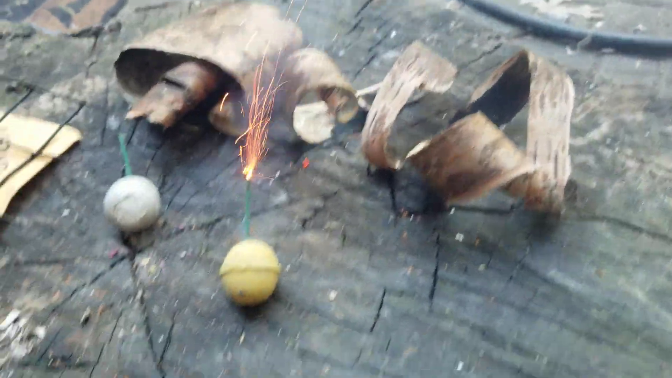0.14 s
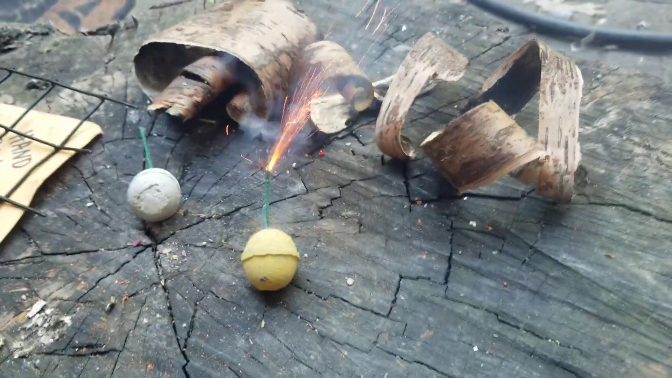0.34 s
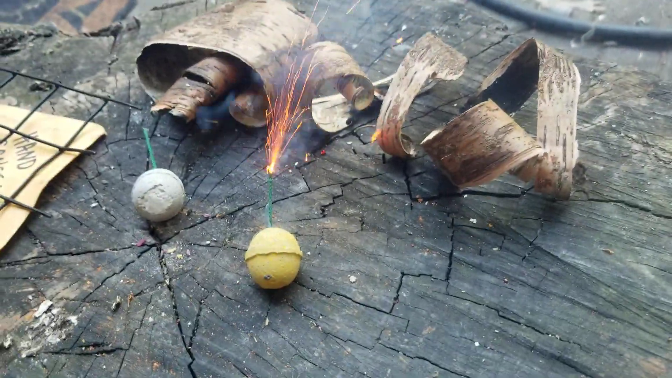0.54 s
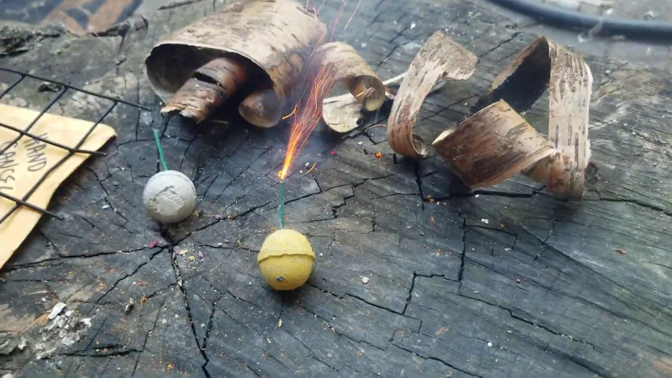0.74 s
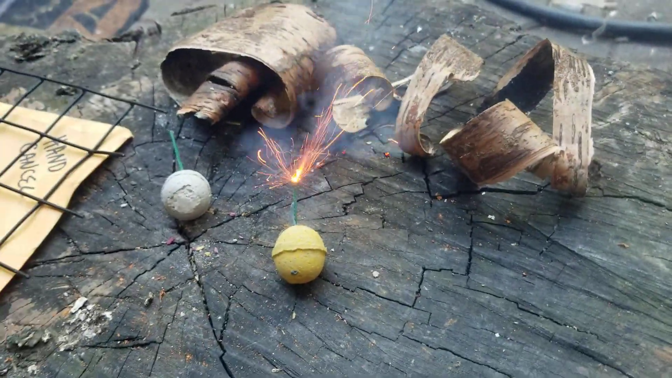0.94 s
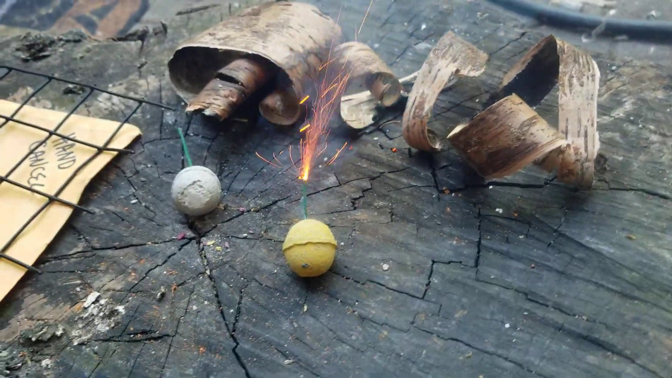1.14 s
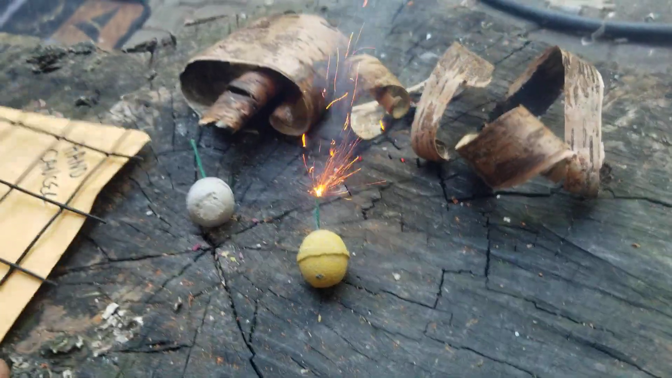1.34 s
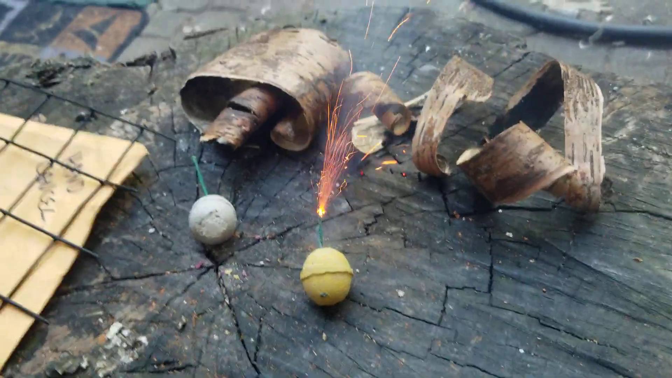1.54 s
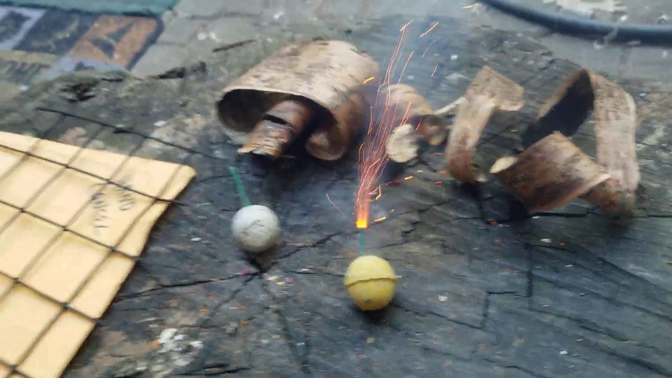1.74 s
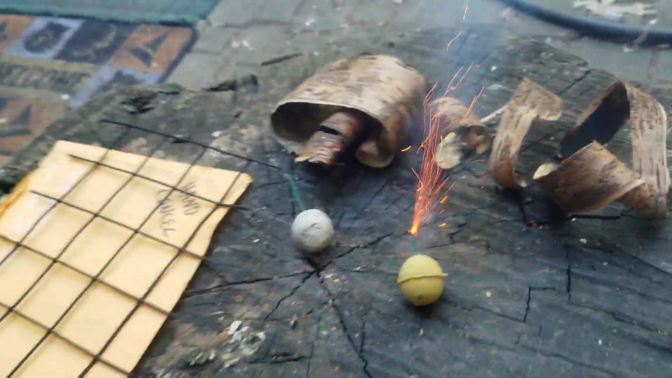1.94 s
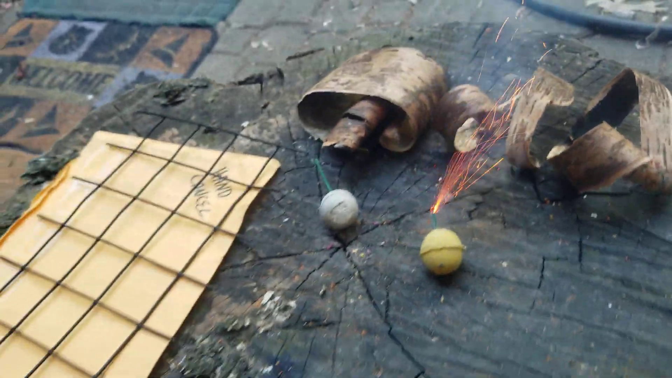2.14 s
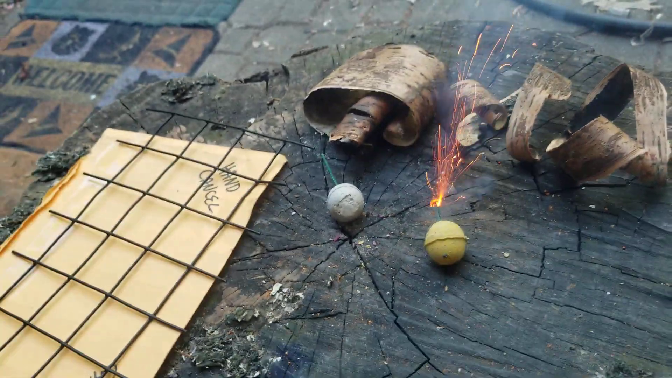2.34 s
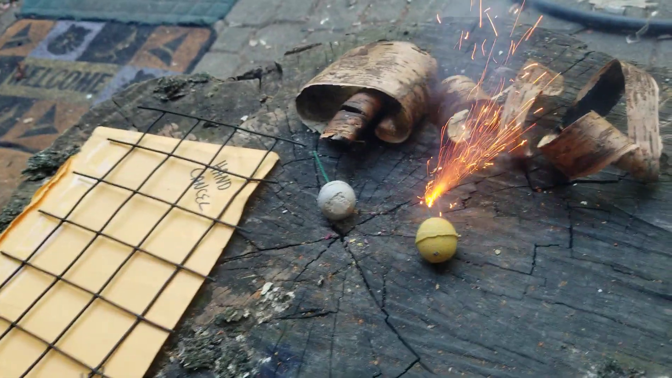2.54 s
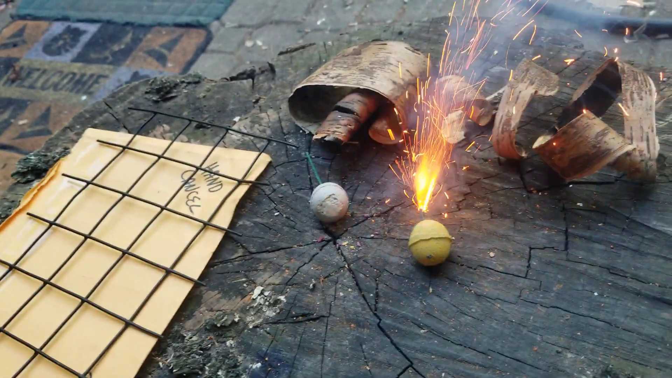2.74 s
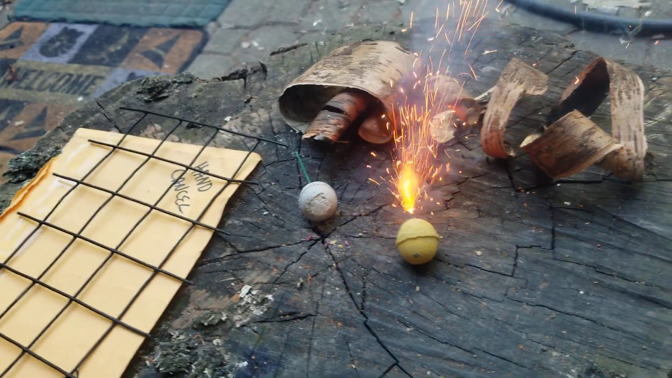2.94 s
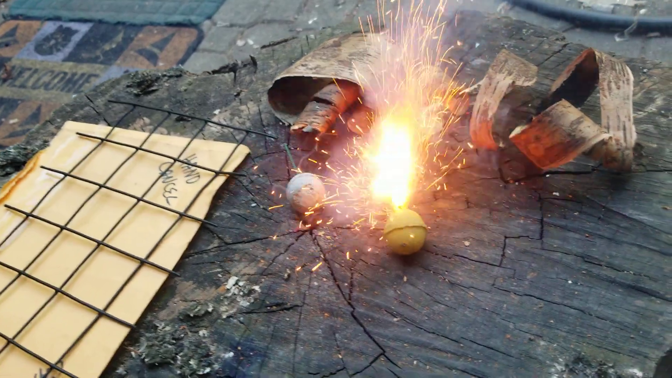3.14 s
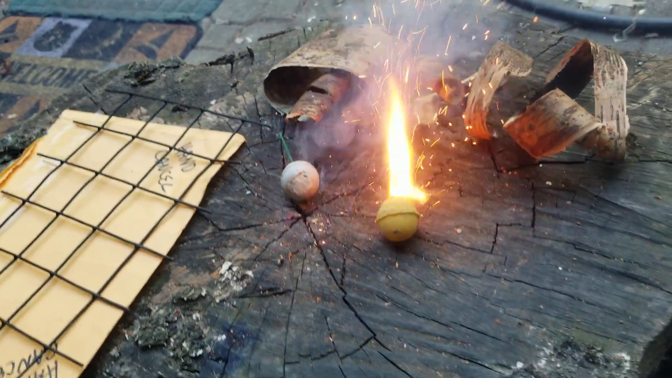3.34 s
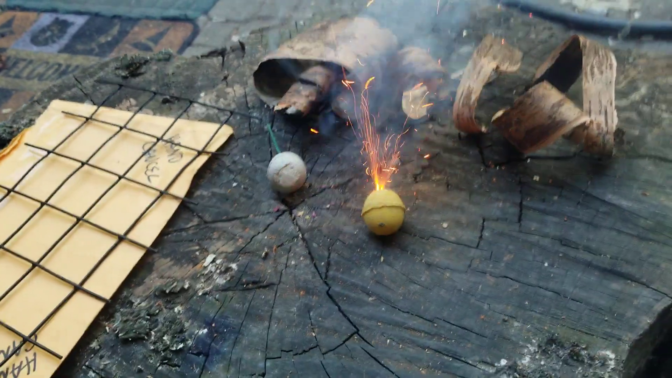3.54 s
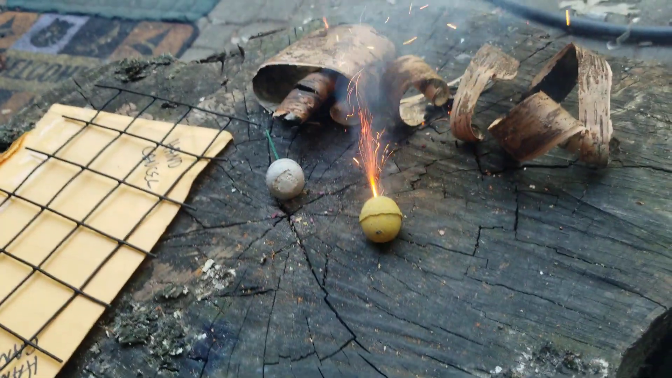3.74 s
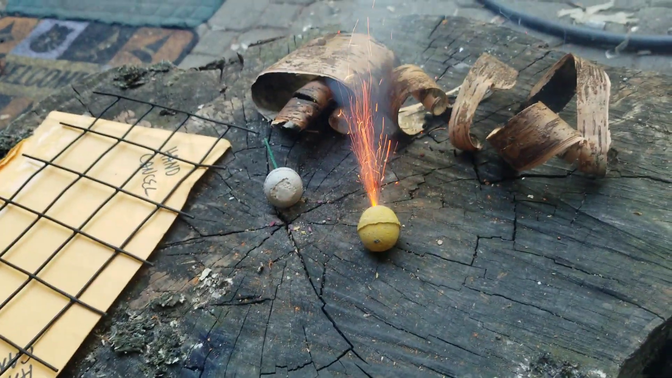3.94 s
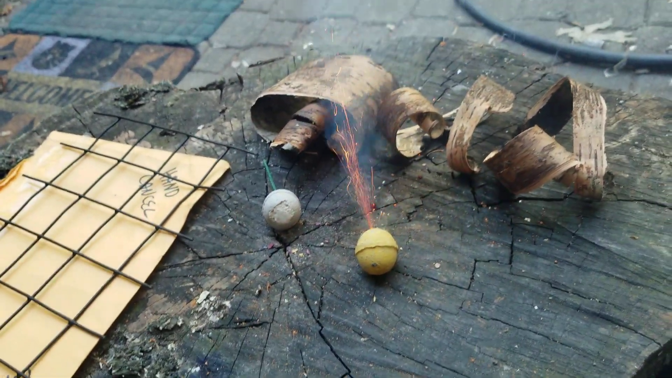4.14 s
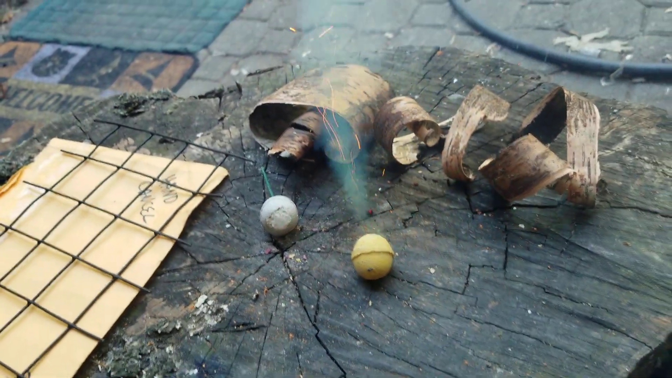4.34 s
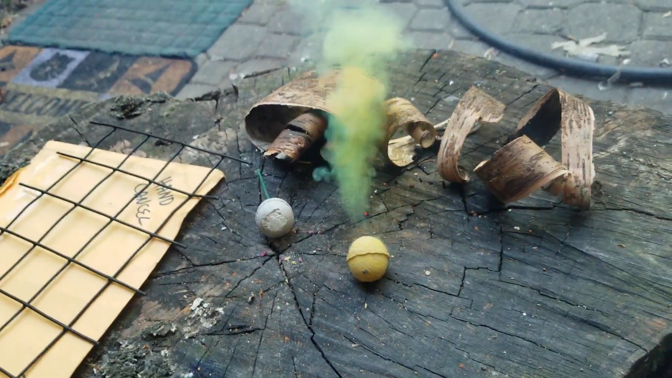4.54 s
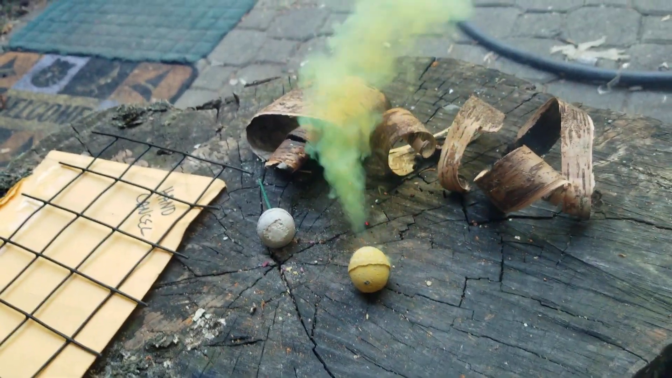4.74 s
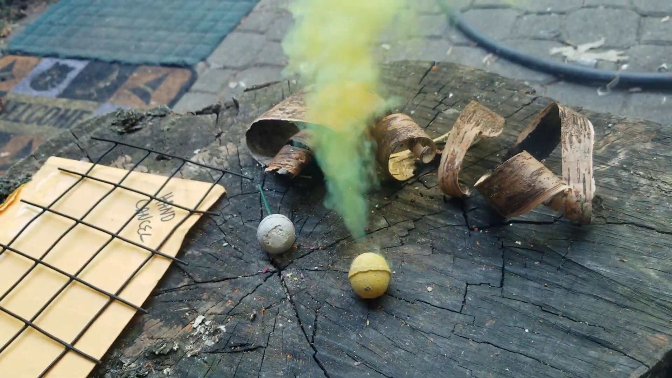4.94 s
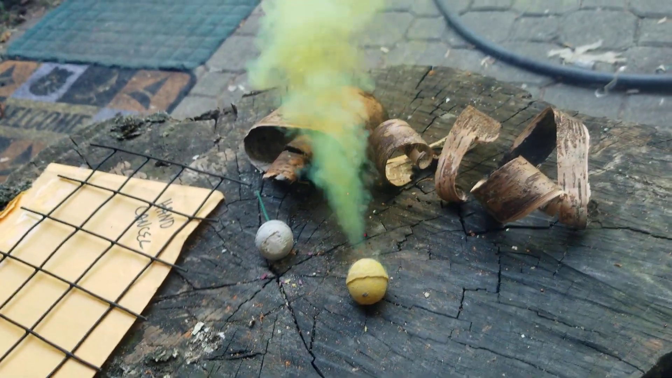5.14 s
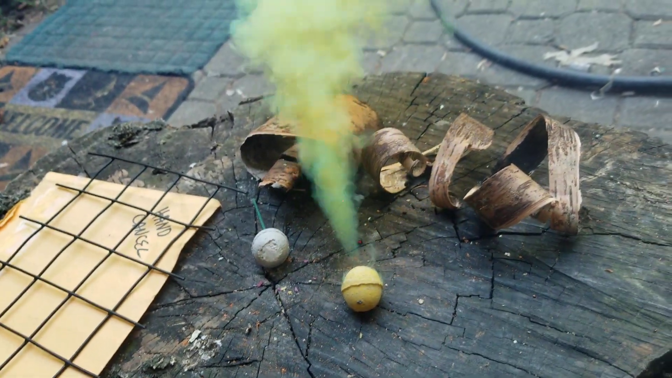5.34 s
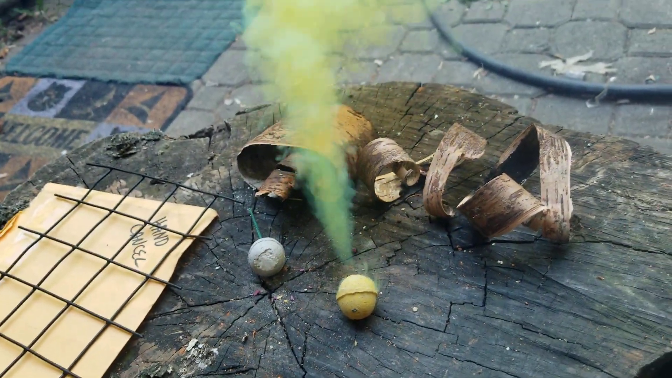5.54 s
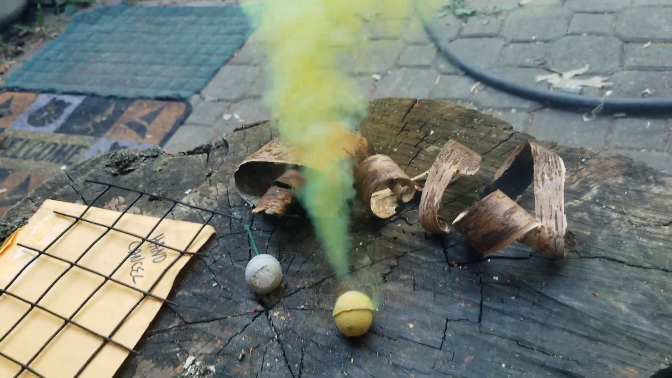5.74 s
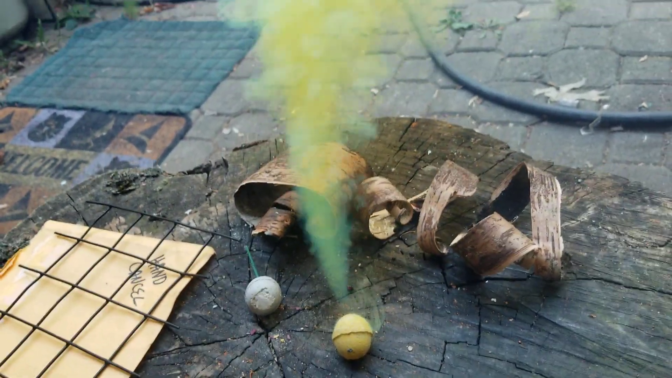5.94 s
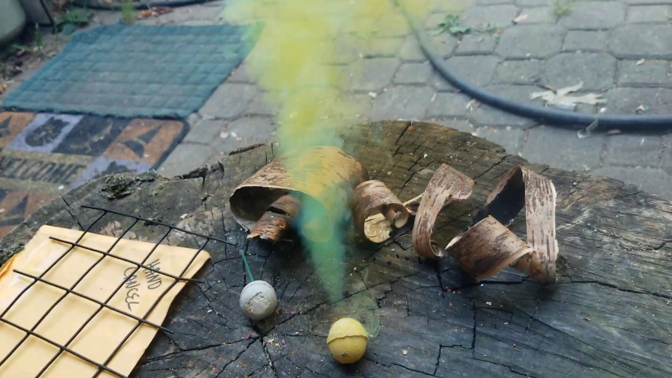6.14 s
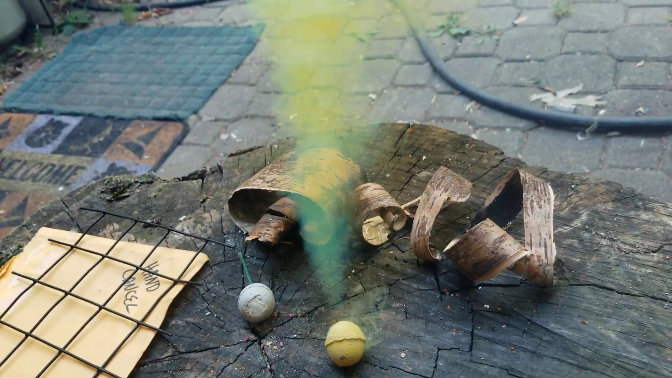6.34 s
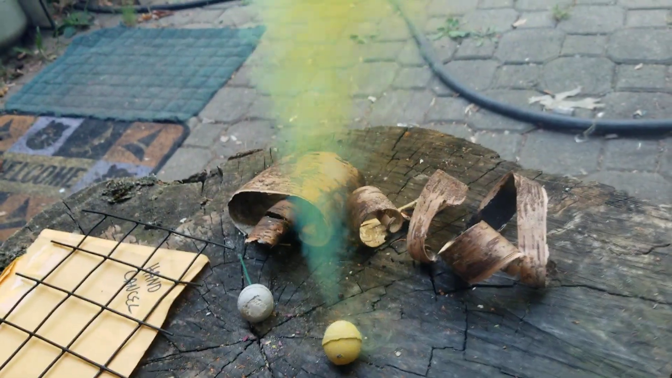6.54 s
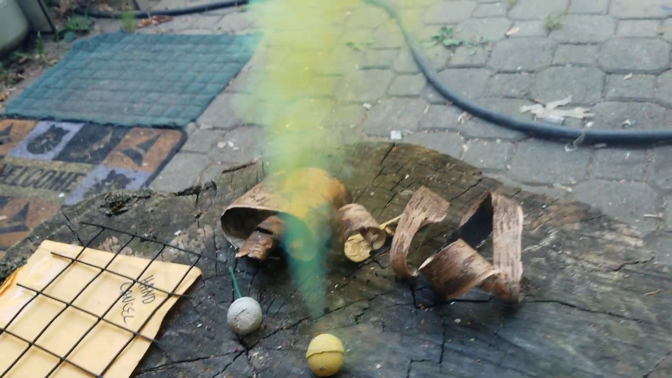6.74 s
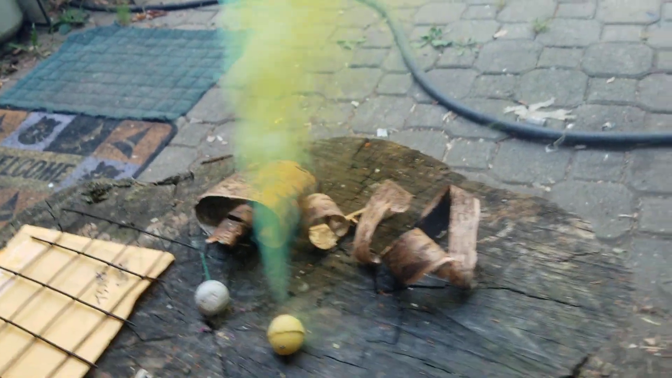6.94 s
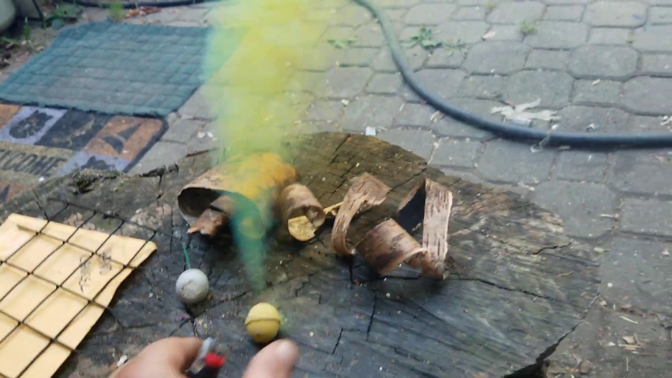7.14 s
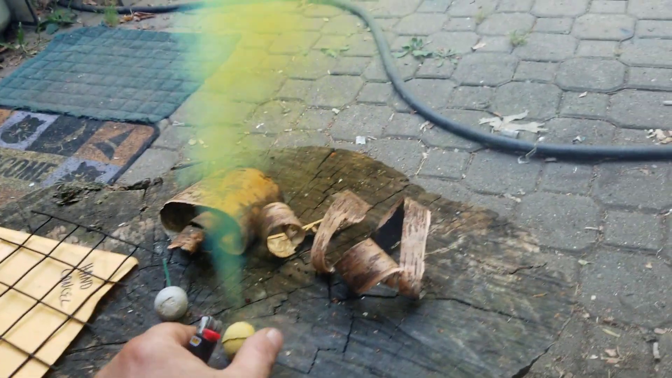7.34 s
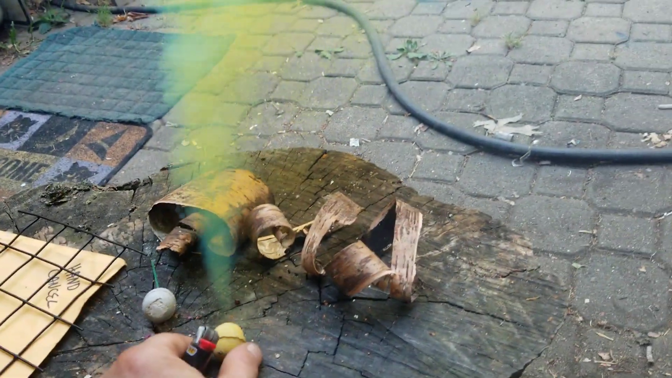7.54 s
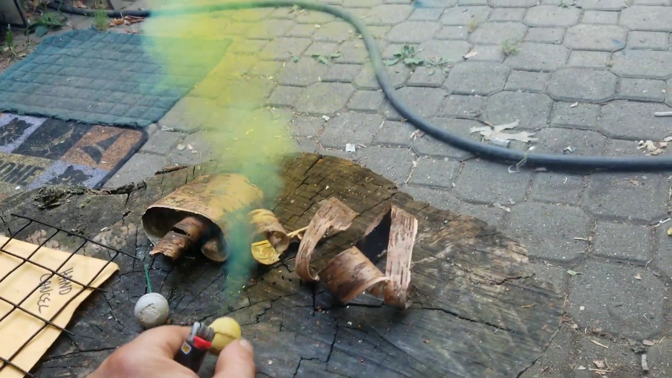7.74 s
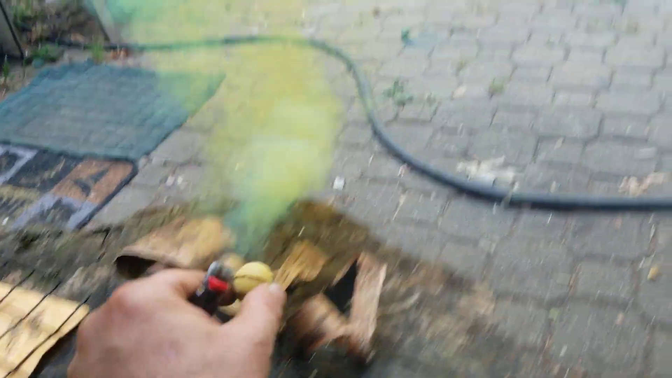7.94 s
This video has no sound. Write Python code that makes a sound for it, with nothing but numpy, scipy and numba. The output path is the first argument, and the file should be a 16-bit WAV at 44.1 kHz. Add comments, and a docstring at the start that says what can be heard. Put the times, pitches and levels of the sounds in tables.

```python
"""A fuse burns on a tree stump with a roaring flame and bright gas hiss, dies, and a smoke ball's vent takes over.
Roar and hiss are coloured noise that sputters and surges; puffs are short noise bursts, one with a low thump.
A hand-held phone hears them at two ports, through bounces off its body, the hand and the stump.
Behind: a sine of mains hum, two wavering far engine tones, and noise for traffic rumble and outdoor air."""
import sys
import numpy as np
from scipy import signal
from scipy.fft import rfft, irfft, next_fast_len
from scipy.io import wavfile
from scipy.ndimage import uniform_filter1d, map_coordinates
from numba import njit

SR = 44100
rng = np.random.default_rng(int(sys.argv[2]) if len(sys.argv) > 2 else 0)


def wrap_up_sound(samples):
    """Save the sound to the file named by the first command line argument, as 16-bit audio."""
    columns = np.atleast_2d(samples).T
    # keep every value between -1 and 1, then stretch to whole-number steps
    tamed = np.clip(columns, -1, 1)
    steps = np.round(tamed * 32767).astype(np.int16)
    wavfile.write(sys.argv[1], SR, steps)


N = 356189

# burning fuse, then the smoke vent: start_s, roar_db, hiss_db
FUSE_LEVELS = [(0, -48, -44), (.8, -47.5, -46), (1.2, -47, -43), (1.55, -43, -40.5), (1.75, -43, -39),
               (2.4, -45, -38), (2.6, -43.5, -40.5), (3.0, -46.5, -40.5), (3.37, -45, -40.5),
               (3.46, -42, -33.5), (3.65, -48, -35.5), (4.0, -44, -29.5), (4.16, -45, -32.5),
               (4.3, -43.5, -32), (4.36, -49.5, -36), (4.45, -50.5, -63)]
SMOKE_LEVELS = [(4.6, -55.5, -69), (4.81, -54, -65), (4.88, -51, -54), (5.56, -50.5, -48),
                (5.85, -46.5, -41.5), (6.73, -44.5, -32.5), (7.04, -44, -35), (7.21, -42.5, -29.5),
                (7.29, -42.5, -31), (7.4, -42.5, -29.5), (7.74, -43.5, -34.5), (7.87, -49, -38.5),
                (8.08, -50, -41.5)]
# level of the flame's bass: start_s, level_db
FLAME_BASS_LEVEL = [(0, -52), (1.2, -50), (1.6, -48), (2.7, -47), (3.1, -47), (3.17, -39.5), (3.25, -45.5),
                    (3.37, -45.5), (3.46, -49), (4.3, -55), (4.5, -57.5), (5.3, -59.5), (6.7, -56),
                    (8.08, -58)]
# relative noise colour of roar and hiss at each port, and of the flame's bass: freq_hz, colour_db
ROAR_LEFT_COLOUR = [(200, -10.5), (450, -20), (800, -15.5), (1500, -8.5), (2500, -10.5), (4000, -15),
                    (7000, -14), (16000, -46)]
ROAR_RIGHT_COLOUR = [(200, -8), (450, -9), (800, -1.5), (1200, 2.5), (1650, 10.5), (1950, -3.5),
                     (2400, 0.5), (3500, -7.5), (7000, -8), (16000, -11)]
HISS_LEFT_COLOUR = [(500, -37), (2000, -31), (4000, -7), (6000, -11), (7500, -8.5), (9000, -4), (11000, 2),
                    (13000, 0.5), (15000, 6.5), (16000, 0)]
HISS_RIGHT_COLOUR = [(500, -43), (1550, -20.5), (2500, -5.5), (3500, -3), (4500, -10.5), (5800, -21.5),
                     (6600, -7), (8500, -2.5), (10800, 0.5), (11900, 12.5), (13500, 9), (14800, 5.5),
                     (15500, -5), (16000, 2)]
FLAME_BASS_COLOUR = [(60, 2.5), (150, 2.5), (300, 0.5), (500, -7), (800, 0), (1500, -12), (16000, -58)]
# part of the jet noise that reaches each port by its own paths: freq_hz, level_db
SCATTERED_COLOUR = [(200, -15.5), (500, -5.5), (1000, -10.5), (2000, -4.5), (4000, -0.5), (8000, -2.5),
                    (14000, -4.5)]
# hiss balance as the phone turns: start_s, left_minus_right_db
HISS_PAN = [(0, -6.5), (.8, -3.5), (1.2, -6), (1.75, -8), (1.95, -12), (2.4, -10.5), (3.15, -12),
            (3.45, -9), (4.3, -8), (5.5, -7.5), (5.7, -10), (6.75, -10), (7.1, -6.5), (7.5, -4.5),
            (8.08, -6)]
# the phone's pose: start_s, left_body_bounce_ms, right_body_bounce_ms, left_lag_ms
PHONE_POSE = [(0, 0.2, 0.14, -0.059), (.4, 0.16, 0.13, -0.045), (1.1, 0.15, 0.13, -0.029),
              (1.6, 0.13, 0.13, 0.0039), (2, .12, .13, 0.096), (2.3, 0.12, 0.12486, 0.13),
              (2.7, 0.11, .13, 0.066), (3.1, 0.099, 0.13, 0.056), (4.3, 0.098, 0.13, 0.049),
              (5.5, 0.1, 0.12, 0.025), (6.7, 0.093, 0.12, 0.0077), (7.1, 0.096, 0.14, -0.047),
              (8.08, 0.082, .14, -0.054)]
# strength of the phone body's bounce: left_share, right_share
BODY_BOUNCE_SHARE = (.6, .4)
# bounces off stump, bark and hand: delay_ms, left_share, right_share
NEAR_BOUNCES = [(.36, 0.046, -0.022), (0.467, 0.062, 0.041), (0.524, -0.016, -0.13), (0.602, 0.016, 0.031),
                (0.738, 0.025, -0.083), (0.972, -0.17, 0.091), (1.202, 0.092, -0.13), (1.65, 0.09, -0.12),
                (1.95, -0.063, -0.03)]
# lists of narrow hollows that slide as the phone turns: start_s, centre_hz, depth_0_to_1
LEFT_HOLLOWS = [
    [(1.5, 11800, 0), (2.2, 12200, .5), (3.2, 12200, .4), (4.3, 12200, .7), (5.7, 12100, .55),
     (6.2, 12020, 0.01)],
    [(0, 7700, .8), (.5, 7400, 0.5), (2.5, 7500, 0.9), (3.3, 7700, 1), (4.3, 7700, 0.98), (6.5, 7400, .2),
     (7.3, 7950, 1), (8, 7850, 1)],
    [(.3, 3800, 0.2), (1.3, 3600, 0.6), (2.2, 3450, 0.7), (3, 3450, 0.4), (3.5, 3404, 0.3)],
    [(2, 4700, 0), (3, 4800, 0.6), (3.4, 5950, 0.6), (3.8, 5750, 1), (4.3, 5700, 0.56), (5, 5000, .5),
     (7, 4536, .3), (8, 4360, 0.06)],
]
RIGHT_HOLLOWS = [
    [(0, 10300, 0.4315), (.6, 11500, 0.66), (1.2, 10700, 0.95), (1.9, 10100, 0.825), (2.4, 9600, 0.51),
     (3.1, 9400, 0.89), (4.3, 9800, 0.88), (6.5, 10500, 0.6), (7.2, 10550, 1), (8, 10400, 0.78)],
    [(0, 11200, .3), (.8, 11900, .4), (1.7, 11200, .5), (2, 11100, .85), (2.4, 11500, .8),
     (3.1, 11100, .85), (4.3, 11400, .7), (5.5, 11500, .5), (6.5, 11200, 0)],
    [(0, 8700, 0.8), (.9, 9300, 0.063), (1.4, 9670, 0), (3, 7700, 0.26), (4.3, 7850, 1), (5, 8620, 0.24),
     (6.5, 8800, 0.85), (7.1, 9600, 1), (8, 9600, 1)],
    [(0, 3755, 1), (1.7, 3745, 0.6), (2.2, 3970, 0.8), (3, 4200, 1), (4.3, 4530, 0.55), (5.6, 4550, 0.54),
     (6.2, 4420, 0.09)],
    [(0, 2900, .4), (3, 3050, .5), (6, 3200, .6), (6.8, 3450, .8), (7.2, 3800, .8), (8, 3700, .6)],
    [(0, 5430, 0.2), (1.7, 5130, 1), (2.3, 4560, 1), (3.1, 4950, 1), (3.3, 5600, 0.96), (4.3, 5500, 0.97),
     (5, 6100, 0.44), (6.7, 5794, 0.6), (8, 5400, 0.41)],
    [(0, 2140, 1), (3, 1806, 0.089), (6.5, 1830, 0.37), (8, 2300, 1)],
]
HOLLOW_WIDTH_HZ = 550.0
# two far engines: start_s, pitch_hz, rms_level_db
LOW_ENGINE = [(0, 41.3, -52), (.54, 45.65, -57), (1.0, 54.6, -47), (1.3, 55.7, -55), (1.66, 64.3, -43),
              (1.76, 62, -56), (1.86, 62.3, -44), (2.2, 58.8, -46), (2.6, 54.14, -50), (3.15, 49.8, -49.5),
              (3.44, 53.5, -38), (3.91, 52.6, -47), (4.7, 49.25, -49.5), (5.13, 46.35, -46),
              (6.3, 44, -54.5), (6.8, 43.1, -46), (7.74, 43, -52.5), (8.08, 48, -48)]
HIGH_ENGINE = [(3.2, 77, -80), (3.35, 76.4, -46), (3.7, 74.5, -43), (4.2, 72.1, -53), (4.55, 75.4, -45.5),
               (4.95, 76.7, -51), (5.1, 71.5, -43), (5.5, 73.8, -47.5), (6.1, 75.3, -42), (6.45, 73, -50),
               (6.8, 73.8, -39.5), (6.96, 73.9, -34), (7.17, 72, -35.5), (7.27, 68.6, -63), (7.33, 70, -33),
               (7.54, 68.2, -47.5), (7.7, 72.45, -43), (7.9, 71.1, -38.5), (8.08, 70, -34.5)]
# waver of each engine tone, low then high: level_waver_db, pitch_waver_share
ENGINE_WAVER = [(3, .04), (2, .012)]
HUM_HZ, HUM_RMS_DB = 120, -46.5
# relative colours of traffic rumble and outdoor air: freq_hz, colour_db
RUMBLE_COLOUR = [(12, -58), (20, -39), (54, 2), (109, -4), (140, -11.5), (172, -9.5), (229, -14.5),
                 (300, -44), (390, -60.5), (660, -120)]
AIR_COLOUR = [(150, -34.5), (250, -2), (429, -40), (501, -5), (618, -16), (698, -19), (890, 1), (1180, 1.5),
              (2360, -4), (3120, -43), (5350, -29), (6140, -22), (6940, -6), (8700, -21), (16000, -30)]
RUMBLE_RMS_DB, AIR_RMS_DB = -50, -57
# balance of rumble and air between the ports: freq_hz, left_minus_right_db
AIR_BALANCE = [(60, 9), (110, 8), (200, -3), (380, 32), (700, 21.5), (1290, 7.5), (2380, -8), (4400, -6),
               (8120, -11.5), (15000, 17)]
# brief surges and dips of the burning: centre_s, length_s, roar_rise_db, hiss_rise_db
BURN_SURGES = [(0.919, 0.038, 4, 4.5), (1.662, .04, 3, 1), (1.848, .05, 1.5, 0.5), (2.2, 0.045, 4, -0.5),
               (3.068, 0.075, 6, 1), (3.182, 0.078, 6, 1), (3.24, 0.055, -3.5, 3.5), (4.004, 0.091, 5, 0),
               (5.6, .04, 0, 5.5), (7.96, .05, -1.5, 3.5)]
# flame puffs: start_s, level_db, centre_hz, envelope_ms
FLAME_PUFFS = [(1.64, -34, 1351, 7.6), (2.184, -33, 695, 20), (2.204, -37, 1660, 8.5),
               (3.05, -38, 1510, 8.8), (3.149, -34.5, 900, 10), (3.175, -34, 700, 13)]
# low push of air: start_s, level_db, pitch_hz, t60_s
AIR_THUMPS = [(3.178, -16, 78, 0.078)]
# a hand lifts the ball, bounce off the wood below: start_s, delay_ms, share
BALL_LIFT = [(7.7, .2, 0), (7.77, .28, .4), (7.9, .48, .45), (8.08, .78, .35)]
# how much of that bounce reaches the left, then the right port: share
LIFT_PORT_SHARE = [
    [.5],
    [1],
]
TOP_HZ = 15920


def undb(db):
    """Decibels to gain."""
    return 10 ** (np.asarray(db) / 20)


def unit(x):
    """Scale to rms 1."""
    return x / np.sqrt(np.mean(x ** 2))


def track(table):
    """Turn the columns after the time column into curves, one value a sample."""
    start_s, *columns = np.transpose(table)
    time_s = np.arange(N) / SR
    return [np.interp(time_s, start_s, column) for column in columns]


def colour(x, points):
    """Filter by frequency and dB points joined on a log frequency axis."""
    size = next_fast_len(N)
    hz, db = np.transpose(points)
    bin_hz = np.arange(size // 2 + 1) * SR / size + 1e-3  # keeps the log finite at zero
    gain = undb(np.interp(np.log(bin_hz), np.log(hz), db))
    return irfft(rfft(x, size) * gain, size)[..., :N]


def delay(x, ms):
    """Delay x by a time that may move."""
    return map_coordinates(x, [np.arange(N) - ms * SR / 1000], order=3, mode="nearest")


def walk(rate):
    """Random drift: levels held for 1 / rate s, slewed twice, spread 1."""
    hold = int(SR / rate)
    steps = np.repeat(rng.standard_normal(N // hold + 1), hold)
    drift = uniform_filter1d(uniform_filter1d(steps, hold), hold)[:N]
    return drift / np.std(drift)


def jet(left_colour, right_colour):
    """One turbulent noise coloured for each port, with an unrelated scattered part."""
    scattered = colour(rng.standard_normal((2, N)), SCATTERED_COLOUR)
    left, right = rng.standard_normal(N) + scattered
    return np.array([colour(left, left_colour), colour(right, right_colour)])


def burning():
    """Roar and hiss sputter together as the powder burns unevenly; each also flickers alone."""
    roar_db, hiss_db = np.array(track(FUSE_LEVELS + SMOKE_LEVELS)) + surges()
    (pan_db,), (bass_db,) = track(HISS_PAN), track(FLAME_BASS_LEVEL)
    sputter = walk(13) + .5 * walk(45)

    roar = jet(ROAR_LEFT_COLOUR, ROAR_RIGHT_COLOUR)
    roar = roar / np.std(roar.mean(axis=0))
    roar = roar * undb(roar_db + 0.92 * sputter + 0.7 * walk(60))

    bass = unit(jet(FLAME_BASS_COLOUR, FLAME_BASS_COLOUR))
    bass = bass * undb(bass_db + 1.74 * walk(20) + 0.66 * sputter)

    left, right = jet(HISS_LEFT_COLOUR, HISS_RIGHT_COLOUR)
    hiss = np.array([unit(left) * undb(pan_db), unit(right)])
    hiss = hiss * 2 / np.sqrt(1 + undb(2 * pan_db))  # panning keeps the summed power of the ports
    hiss = hiss * undb(hiss_db + 0.5 * sputter + 0.81 * walk(150) + 0.78 * walk(4.98))
    return roar + bass + hiss


@njit
def hollow(x, hz, depth, width_hz):
    """Take a moving narrow band out of x with a two-integrator resonator."""
    y, band_state, low_state = np.empty(len(x)), 0., 0.
    for i in range(len(x)):
        g, damping = np.tan(np.pi * hz[i] / SR), width_hz / hz[i]
        band = (band_state + g * (x[i] - low_state)) / (1 + g * (g + damping))
        band_state = 2 * band - band_state
        low_state = low_state + 2 * g * band
        y[i] = x[i] - depth[i] * damping * band
    return y


def ports(x):
    """The way to each port: lag, nearby bounces that sway with the hand, body bounce, sliding hollows."""
    left_ms, right_ms, lag_ms = track(PHONE_POSE)
    paths = [(lag_ms, left_ms, LEFT_HOLLOWS), (0 * lag_ms, right_ms, RIGHT_HOLLOWS)]
    out = []
    for port, (late_ms, body_ms, hollows) in enumerate(paths):
        direct = delay(x[port], late_ms)
        near = direct.copy()
        for ms, *shares in NEAR_BOUNCES:
            near += shares[port] * delay(direct, ms * (1 + .02 * walk(.8)))
        near = near + BODY_BOUNCE_SHARE[port] * delay(near, body_ms)
        for table in hollows:
            hz, depth = track(table)
            # the hand trembles
            hz = hz * (1 + .008 * walk(5))
            depth = np.clip(depth * (1 + .15 * walk(7)), 0, 1)
            near = hollow(near, hz, depth, HOLLOW_WIDTH_HZ)
        out.append(near)
    return np.array(out)


def drones():
    """A mains hum of slightly wavering level and two engine tones, their phase drifting between ports."""
    hum = np.sin(2 * np.pi * HUM_HZ * np.arange(N) / SR)
    out = undb(HUM_RMS_DB + 1.37 * walk(11)) * hum * np.ones((2, 1))
    for table, (waver_db, wobble) in zip((LOW_ENGINE, HIGH_ENGINE), ENGINE_WAVER):
        hz, db = track(table)
        phase = 2 * np.pi * np.cumsum(hz * (1 + wobble * walk(20))) / SR
        apart = .3 * walk(2) * np.array([[1], [-1]])  # radians
        port_db = db + waver_db * walk(12) + np.array([[.9], [-.9]])
        out = out + undb(port_db) * np.sin(phase + apart)
    return np.sqrt(2) * out  # sine peak from rms level


def air():
    """Traffic rumble and outdoor hiss: bass much alike at both ports, treble mostly opposed."""
    out = 0
    half_balance = np.array(AIR_BALANCE) * [1, .5]
    side_colour = [(30, -24), (120, -34.5), (250, -14), (600, 9.5), (1500, 11)]  # Hz, dB against mid
    layers = [(RUMBLE_COLOUR, RUMBLE_RMS_DB + 0.5 * walk(2.9)), (AIR_COLOUR, AIR_RMS_DB + 0.47 * walk(4.1))]
    for points, db in layers:
        mid, side = rng.standard_normal((2, N))
        side = colour(side, side_colour)
        left = colour(mid + side, half_balance)
        right = colour(mid - side, half_balance * [1, -1])
        out = out + unit(colour(np.array([left, right]), points)) * undb(db)
    return out


def surges():
    """Each surge shifts roar and hiss for a moment, in dB: quick onset, hold, quick return."""
    centre_s, length_s, *rise_db = np.transpose(BURN_SURGES)
    offset = (np.arange(N) / SR - centre_s[:, None]) / length_s[:, None]
    return np.array(rise_db) @ np.exp(-(2 * offset) ** 4)


def puffs():
    """Pockets of powder flare: short dull noise bursts, and a low push of air beside the last."""
    out = np.zeros(N)
    for start_s, db, hz, ms in FLAME_PUFFS:
        t = np.arange(4096) / SR * 1000 / ms  # in envelope lengths
        band = signal.butter(1, [hz / 2, hz * 1.5], "band", fs=SR, output="sos")
        burst = unit(signal.sosfilt(band, rng.standard_normal(4096)))
        burst = burst * np.sqrt(t) * np.exp(-t * t)
        first = int(start_s * SR)
        out[first:first + 4096] += undb(db) * burst
    for start_s, db, hz, t60_s in AIR_THUMPS:
        t = np.arange(8192) / SR
        attack = 1 - np.exp(-t / 0.0088)
        decay = np.exp(-np.log(1000) * t / t60_s)
        first = int(start_s * SR)
        out[first:first + 8192] -= undb(db) * np.sin(2 * np.pi * hz * t) * decay * attack
    return out * undb([[-1.5], [1.5]])  # left, right


def lifted(x):
    """The raised ball is heard twice; the rough wood throws back mostly treble, ever later."""
    ms, share = track(BALL_LIFT)
    treble = colour(x, [(3000, -14), (9000, 0)])  # Hz, dB
    bounce = np.array([delay(channel, ms) for channel in treble])
    return x + share * LIFT_PORT_SHARE * bounce


def scene():
    """Sum all sources at the two ports."""
    return ports(lifted(burning() + puffs())) + drones() + air()


def record(dry):
    """The phone cuts the top with a steep low-pass."""
    top_cut = signal.ellip(12, .2, 70, TOP_HZ, fs=SR, output="sos")  # ripple and stop depth in dB
    return signal.sosfilt(top_cut, dry)


dry = scene()
out = record(dry)
wrap_up_sound(out)
```